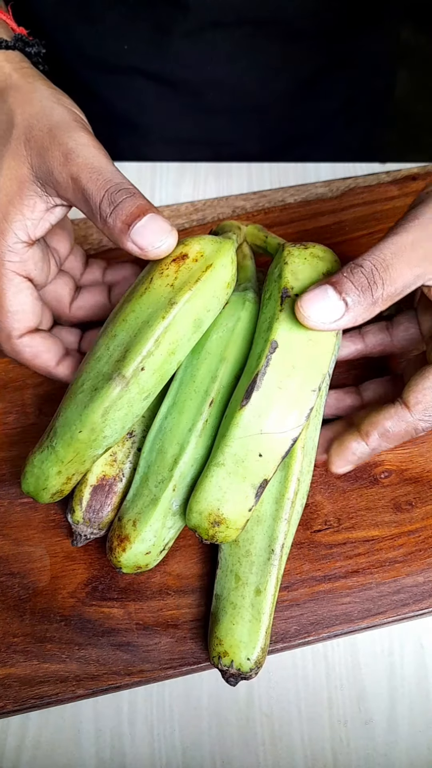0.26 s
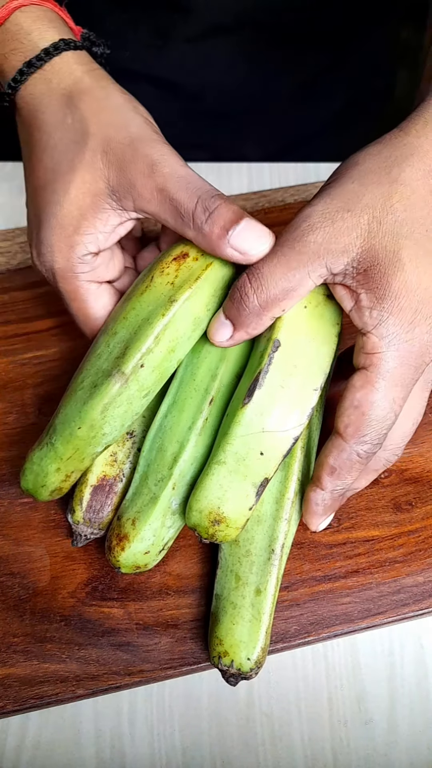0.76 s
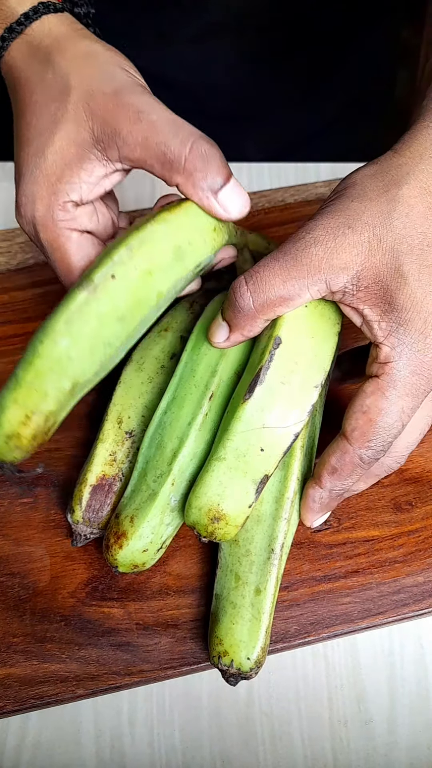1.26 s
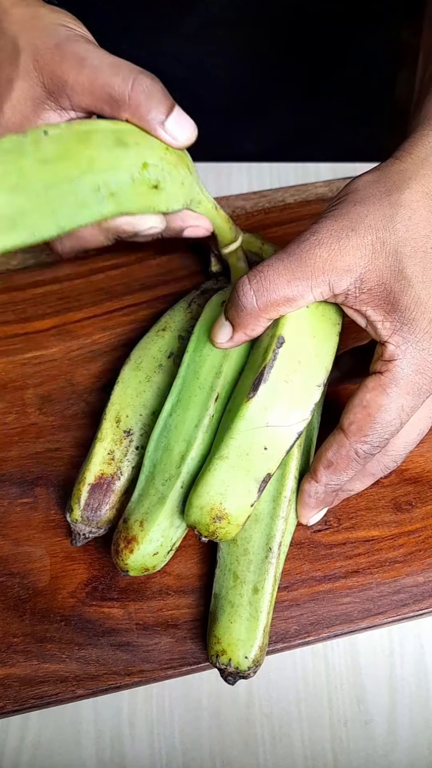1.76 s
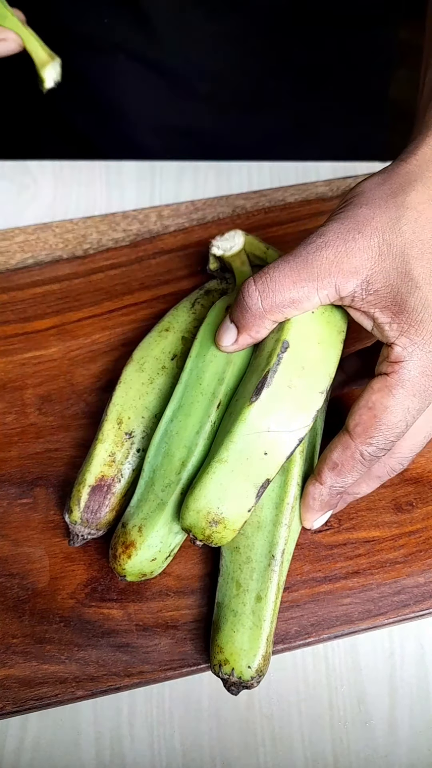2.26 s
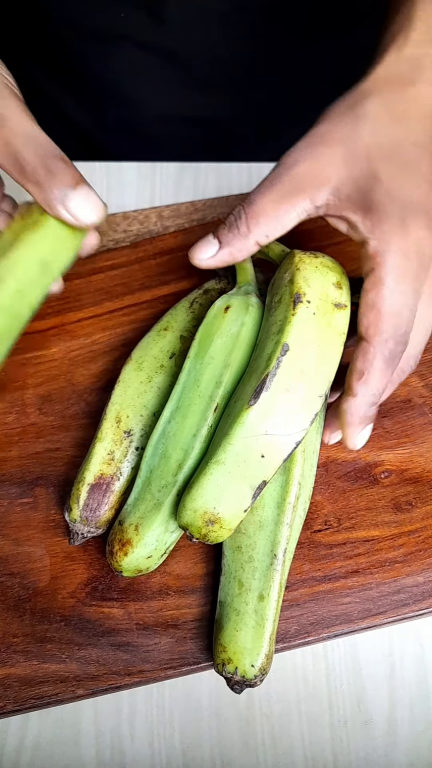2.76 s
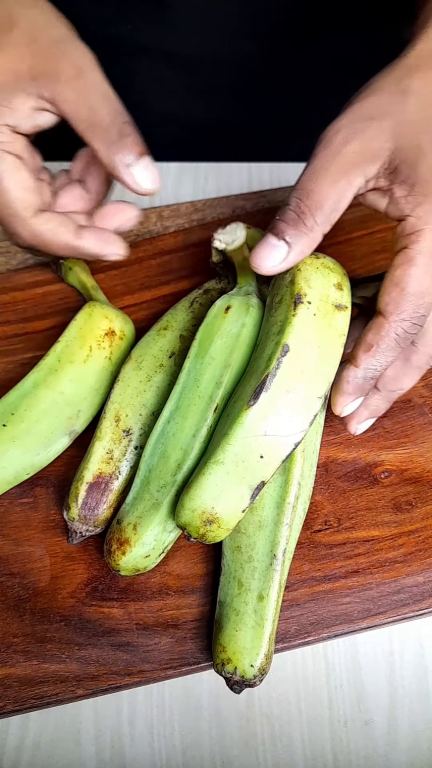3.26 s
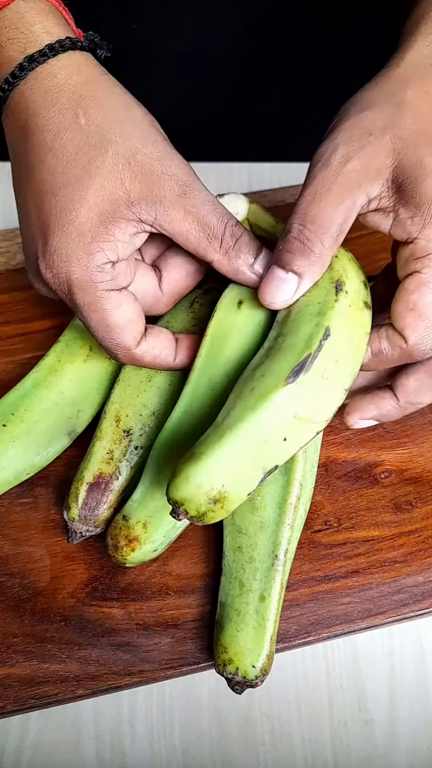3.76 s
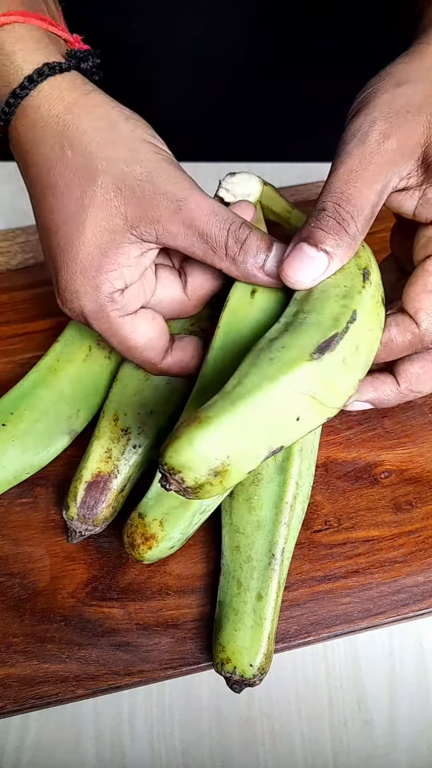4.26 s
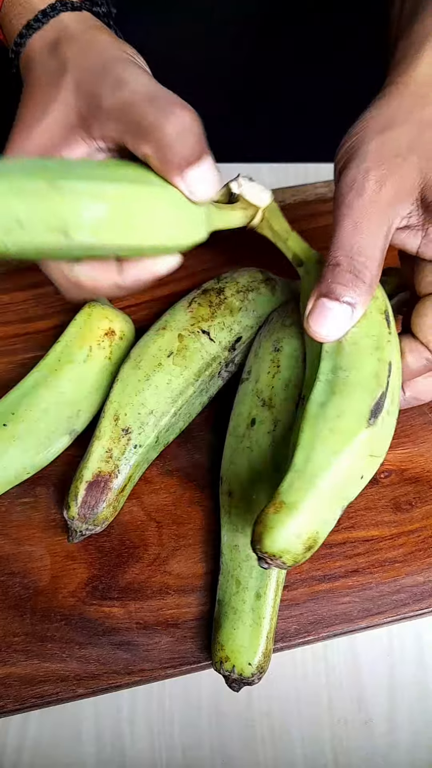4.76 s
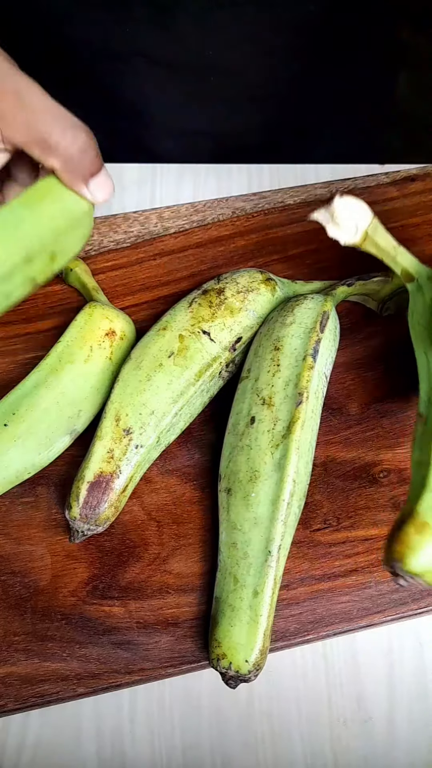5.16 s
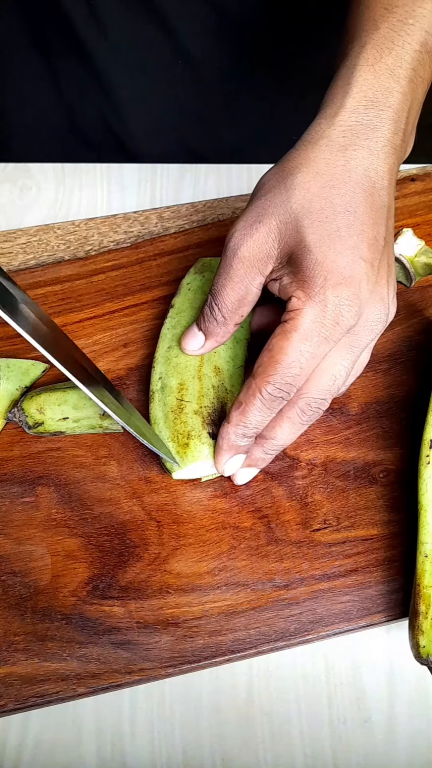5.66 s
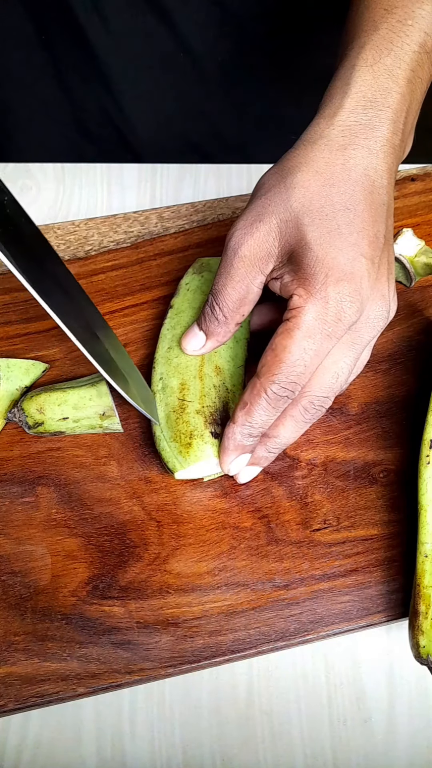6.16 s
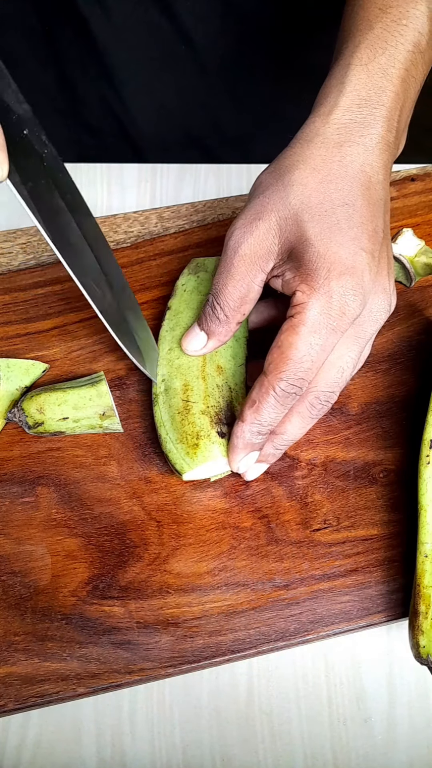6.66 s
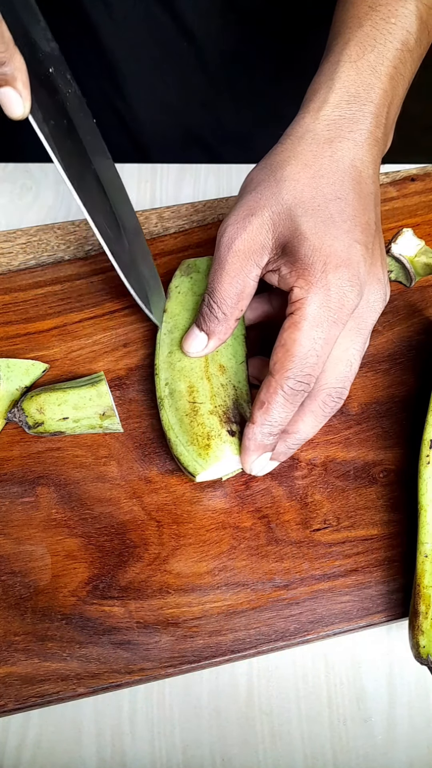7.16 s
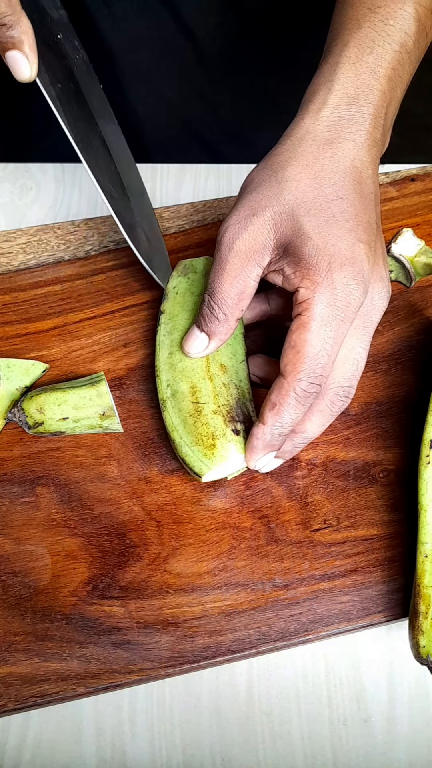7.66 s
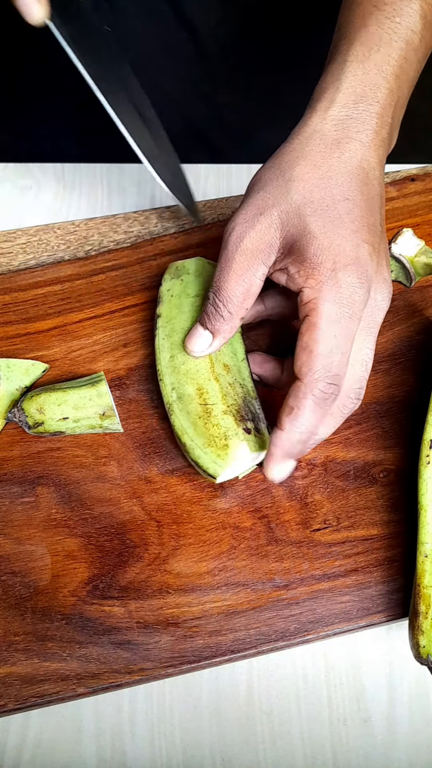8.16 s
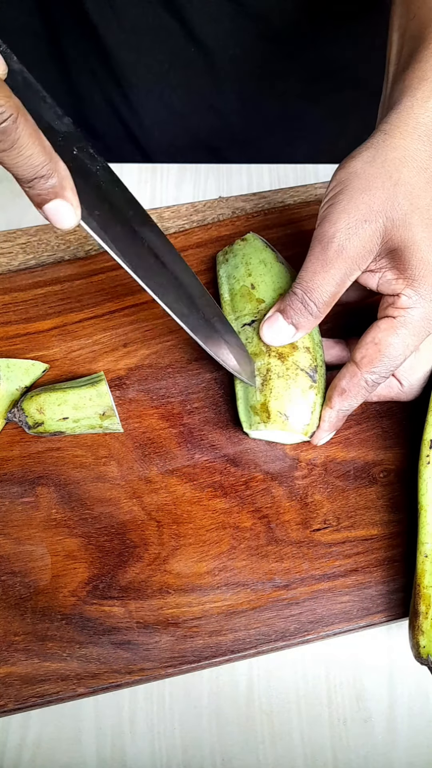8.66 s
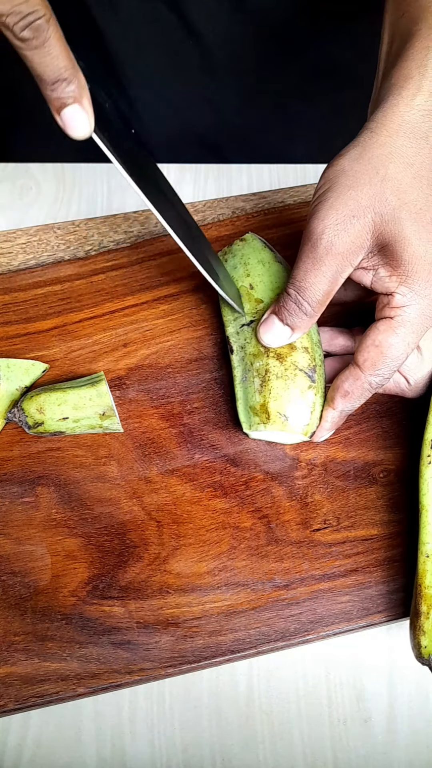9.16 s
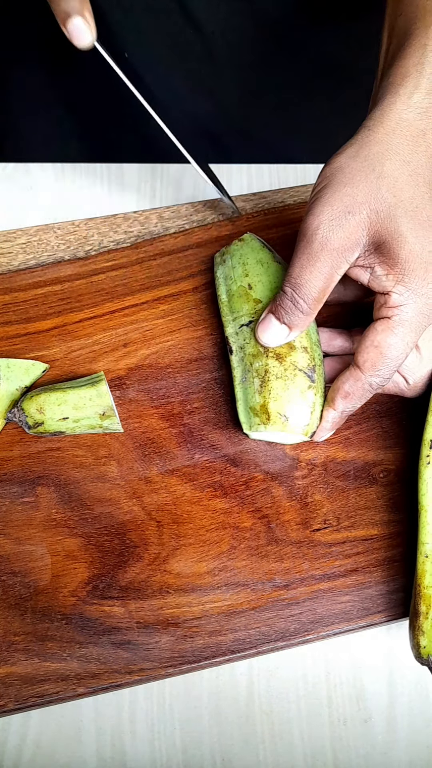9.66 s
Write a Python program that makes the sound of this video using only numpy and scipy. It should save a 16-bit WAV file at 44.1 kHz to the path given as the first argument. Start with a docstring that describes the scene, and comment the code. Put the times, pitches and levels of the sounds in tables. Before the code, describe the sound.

Sharp fibrous snaps as raw bananas are torn from a bunch, dull bumps on wood, then short crisp knife cuts and scrapes with faint room rumble.

```python
"""A small, hard kitchen at rest: rumble, hum, hiss and a dull murmur; then hands lean in and skin rubs on peel.
Stalks of green bananas, held nearer the two microphones than the board, crackle and rip: bursts of clicks.
The fruit lands on a wooden board, whose decaying modes thud while the room booms; then more stalks rip.
Last, a large knife trims one banana and slits its peel in short crunches of cell bursts, blade rings
and sap pops. Filtered noise makes the room's reflections around every source."""
import sys
import numpy as np
from scipy import signal
from scipy.fft import rfft, irfft
from scipy.io import wavfile
from scipy.ndimage import uniform_filter1d

SR = 44100
rng = np.random.default_rng(int(sys.argv[2]) if len(sys.argv) > 2 else 0)


def master_out(mix):
    """Clip the mix to full scale and print it as 16-bit PCM to the path in sys.argv[1]."""
    frames = np.transpose(np.atleast_2d(mix))
    ceiling = np.clip(frames, -1, 1)
    pcm = np.round(ceiling * 32767).astype(np.int16)
    wavfile.write(sys.argv[1], SR, pcm)


N = 437472
HZ = np.fft.rfftfreq(N, 1 / SR)
TIME = np.arange(N) / SR


def amp(db):
    """Decibels to gain."""
    return 10 ** (np.asarray(db) / 20)


def unit(x):
    """Scales to rms 1."""
    return x / np.sqrt(np.mean(x ** 2) + 1e-20)


def read(points, hz):
    """Reads a table on a log-frequency axis."""
    f, value = np.transpose(points)
    return np.interp(np.log(hz + 1), np.log(f + 1), value)


def add(mix, s, sound):
    """Mixes a sound in at time s."""
    part = mix[..., round(s * SR):][..., :sound.shape[-1]]
    part += sound[..., :part.shape[-1]]


def waver(span_s):
    """Random wavering of rms 1 that changes over about span_s."""
    size = max(round(span_s * SR), 1)
    once = uniform_filter1d(rng.standard_normal(N), size)
    return unit(uniform_filter1d(once, size))


def ping(spectrum, tilt_db, size=1024):
    """Causal click of unit energy with this spectrum, tilted in dB per octave."""
    hz = abs(np.fft.fftfreq(size, 1 / SR))
    gain_db = read(spectrum, hz) + tilt_db * np.log2(1 + hz / 1500)
    log_gain = np.log(amp(gain_db))
    # the Hilbert transform of the log gain gives the phase that packs the energy at the start
    click = np.fft.ifft(np.exp(np.conj(signal.hilbert(log_gain)))).real
    return click / np.linalg.norm(click)


def resonance(hz, width):
    """A click that rings briefly at hz; it is 6 dB down at an offset of width * hz."""
    grid = HZ[::50]
    offset = (grid / hz - 1) / width
    return ping(np.transpose([grid, -20 * np.log10(1 + offset ** 2)]), 0)


def crack(db):
    """One fibre breaks as a single impulse; db is the level over 4 ms."""
    return amp([db]) * np.sqrt(.004 * SR)


def crunch(length, db, per_s, spread_db, taper=0.23, lump_db=0.0, size=300):
    """Cells burst at random, in lumps of a few ms, under a push that swells and lets go."""
    n = max(round(length * SR), 64)
    chance, sign, strength = rng.random((3, SR))[:, :n]
    lumps = unit(uniform_filter1d(rng.standard_normal(SR), size))[:n]
    sizes = amp(spread_db * np.minimum(-np.log(1 - strength), 4) + lump_db * lumps)
    signed_bursts = (chance < per_s / SR) * np.sign(sign - .5) * sizes
    push = signal.windows.tukey(n, taper)
    return amp(db) * unit(signed_bursts * push)


def ports(bursts, click, scatter, fade_s, pan_db=0, count=7, size=900):
    """Rows: left microphone, right one (count samples later), and what goes out into the room.
    Hands, fruit and board scatter every burst differently on its way to each microphone."""
    bursts = np.pad(bursts, (0, size))
    lingering = signal.lfilter([0, 1], [1, -np.exp(-1 / (fade_s * SR))], bursts ** 2)
    noises = rng.standard_normal((2, len(bursts)))
    left_tail, right_tail = (unit(np.sqrt(lingering) * noise) for noise in noises)
    left = unit(unit(bursts) + scatter * left_tail) * amp(pan_db / 2)
    right = unit(unit(np.roll(bursts, count)) + scatter * right_tail) * amp(-pan_db / 2)
    paths = [left, right, unit(bursts)]
    return np.sqrt(np.mean(bursts ** 2)) * signal.fftconvolve(paths, click[None], axes=1)


GLANCE_FROM_S, GLANCE_TO_S, GLANCE_SHARE = .0004, .0018, .36  # delay range; gain of each reflection


def glance(sound, count=2, size=128):
    """Close reflections at random short delays colour each stroke differently."""
    taps = np.zeros(size)
    taps[0] = 1
    for delay_s in rng.uniform(GLANCE_FROM_S, GLANCE_TO_S, count):
        taps[round(delay_s * SR)] += GLANCE_SHARE
    return signal.fftconvolve(sound, taps[None] / np.linalg.norm(taps), axes=1)


# likeness of the sound at the two microphones: (frequency [Hz], left-right correlation [-1 to 1])
MICROPHONE_LIKENESS = [(30, 0.45), (100, 0.92), (200, 0.98), (350, 0.51), (700, 0.22), (2000, 0.25),
                       (16000, 0.067)]


def wash(spectrum):
    """Steady noise of rms 1, much alike at both microphones only in the bass."""
    left, other = rfft(rng.standard_normal((2, N)))
    same = np.clip(read(MICROPHONE_LIKENESS, HZ), -1, 1)
    pair = np.array([left, same * left + np.sqrt(1 - same ** 2) * other])
    return unit(irfft(pair * amp(read(spectrum, HZ)), N))


# decay of the kitchen: (frequency [Hz], time to fall 60 dB [s])
KITCHEN_T60 = [(150, 1.6), (400, 0.6), (1000, 0.47), (2800, 0.47), (7300, 0.46), (15000, 0.36)]
# relative strength of the reflections, before the echo gains in scene(): (frequency [Hz], level [dB])
KITCHEN_LEVEL = [(150, -7.5), (1000, -3.5), (3000, -6.5), (8000, -7.5), (15000, -9)]


def reflections(build_s=0.0066, size=256):
    """Dense reflections that build up briefly, each band dying at its own speed."""
    t = np.arange(SR) / SR
    hz, at, z = signal.stft(rng.standard_normal((2, SR)), SR, nperseg=size)
    t60 = read(KITCHEN_T60, hz)[:, None]
    decay = amp(read(KITCHEN_LEVEL, hz)[:, None] - 60 * at / t60)
    z *= decay * np.sqrt(2 * np.log(1000) / (t60 * SR))  # the root evens out the energy of long and short tails
    same = np.clip(read(MICROPHONE_LIKENESS, hz), -1, 1)[:, None]  # long waves reach both microphones alike
    z[1] = same * z[0] + np.sqrt(1 - same ** 2) * z[1]
    return signal.istft(z, SR, nperseg=size)[1][:, :SR] * (1 - np.exp(-t / build_s))


def kitchen(x, drift_s):
    """The sound drifts between two patterns of reflections; a quick drift leaves a diffuse tail."""
    turn = 2 * np.pi * TIME / drift_s
    echo = np.zeros((2, N))
    for share in (np.cos(turn), np.sin(turn)):
        echo += signal.fftconvolve((x * share)[None], reflections(), axes=1)[:, :N]
    return echo


# spectral shape of the faint hiss: (frequency [Hz], relative level [dB])
HISS_SPECTRUM = [(100, -6), (400, -1), (800, -6.5), (1200, -17.5), (1800, -21), (2600, -24.5),
                 (4500, -25.5), (6300, -30), (8400, -22), (11000, -26), (15500, -27.5), (16500, -44)]
HISS_DB = -68.5


def hiss():
    """Faint steady hiss: noise shaped by its spectrum."""
    return wash(HISS_SPECTRUM) * amp(HISS_DB)


# spectral shape of the faint dull room murmur: (frequency [Hz], relative level [dB])
MURMUR_SPECTRUM = [(150, -25.5), (350, -7.5), (600, -5), (900, -1.5), (1500, -6), (3000, -24), (8000, -61)]
MURMUR_DB, MURMUR_SWING_DB, MURMUR_S = -77, 3, .16  # mean level, rms swing, span of the wavering


def room_murmur():
    """A faint, dull background murmur whose level wavers at random."""
    level_db = MURMUR_DB + MURMUR_SWING_DB * waver(MURMUR_S)
    return wash(MURMUR_SPECTRUM) * amp(level_db)


# strength of the low hum: (time [s], level [dB])
HUM_LEVEL = [(0, -62.5), (.7, -52.5), (1.5, -67), (3.9, -61.5), (4.6, -80), (9.9, -55)]
HUM_HZ = 69.1


def hum():
    """A low sine, alike at both microphones, whose level wavers."""
    level_db = np.interp(TIME, *np.transpose(HUM_LEVEL))
    return np.sqrt(2) * np.sin(2 * np.pi * HUM_HZ * TIME) * amp(level_db)


# spectral shape of the low rumble: (frequency [Hz], relative level [dB])
RUMBLE_SPECTRUM = [(12, -57), (20, -20.5), (32, -20), (54, -10.5), (114, -0.5), (133, 0.5), (162, -8.5),
                   (209, -11), (241, -7), (303, -19.5), (344, -15.5), (420, -26), (567, -35), (600, -28.5),
                   (780, -57.5), (1320, -120)]
# hands lean and work on the board: (start time [s], length [s], level before wavering [dB])
HANDLING_SPANS = [(0.313, 0.94, -54), (1.407, 0.91, -49), (3.651, 0.35, -51.5), (4.6, 0.39, -50.5),
                  (5.413, 0.77, -52), (6.061, 1.447, -48.5), (7.395, 0.98, -50), (8.503, 1.35, -52)]
REST_RUMBLE_DB = -54.5  # the room at rest
LEAN_S, HEAVE_DB, HEAVE_S = 0.13, 1.5, 0.069  # the weight comes on and off over LEAN_S and wavers


def rumble():
    """Low noise that grows as hands lean on the table, over the room at rest."""
    work = np.zeros(N)
    for s, length, db in HANDLING_SPANS:
        lean = np.minimum(TIME - s, s + length - TIME) / LEAN_S
        work += amp(db) * np.clip(lean, 0, 1)
    heaving = work * amp(HEAVE_DB * waver(HEAVE_S))
    return wash(RUMBLE_SPECTRUM) * np.hypot(amp(REST_RUMBLE_DB), heaving)


# skin rubbing on peel and wood: (start time [s], length [s], pitch [Hz], level [dB])
SKIN_RUBS = [(0.473, 0.22, 585, -62), (2.86, 0.056, 335, -47.5), (7.921, 0.08, 454, -58)]


def rubs(width=0.18):
    """Waxy skin sticks and slips: a short, hoarse note."""
    out = np.zeros((3, N))
    for s, length, hz, db in SKIN_RUBS:
        slips = crunch(length, db, per_s=9100, spread_db=3.5)
        add(out, s, ports(slips, resonance(hz, width), scatter=1.0, fade_s=0.0012))
    return out


# spectral shape of peel, also of ticks and blade: (frequency [Hz], relative level [dB])
PEEL_SPECTRUM = [(100, 0.5), (500, 4), (1200, -7.5), (1500, -2), (1850, -3), (2300, -0.5), (3000, -1),
                 (3900, 3.5), (5000, -4), (7700, -3), (9900, -6), (11000, -7), (13500, -4), (15600, -5.5),
                 (16500, -45)]
# fingers and fruit brushing over peel:
# (start time [s], length [s], level [dB], brightness [dB per octave])
PEEL_RUSTLES = [(2.857, 0.027, -61, 2), (2.917, .024, -52.5, 1), (2.942, 0.083, -60.5, -6),
                (3.584, 0.066, -76, -5), (3.896, 0.043, -61.5, -9.5), (4.148, 0.072, -65, -6),
                (4.822, 0.018, -46.5, 0.5), (4.866, 0.022, -43.5, -3), (5.437, 0.052, -74.5, 5.5),
                (6.151, 0.082, -62, -1), (6.412, 0.091, -67, 0), (8.04, 0.066, -67.5, -3.5)]


def rustles():
    """Skin brushes over waxy peel in soft, fine-grained strokes."""
    out = np.zeros((3, N))
    for s, length, db, tilt_db in PEEL_RUSTLES:
        grains = crunch(length, db, per_s=2500, spread_db=4.5, taper=0.63)
        stroke = ports(grains, ping(PEEL_SPECTRUM, tilt_db), scatter=1.2, fade_s=0.0017)
        add(out, s, glance(stroke))
    return out


# heavy fruit dragged and rolled on the board: (start time [s], length [s], level before panning [dB])
FRUIT_SCUFFS = [(1.935, 0.027, -45.5), (2.869, 0.074, -46.5), (2.915, 0.064, -36), (2.974, 0.1, -45),
                (4.848, 0.054, -48), (5.779, 0.04, -44.5), (8.597, 0.034, -53)]
# spectral shape of fruit on wood: (frequency [Hz], relative level [dB])
SCUFF_SPECTRUM = [(25, -28), (55, -8.5), (95, 10.5), (170, 7.5), (320, 2.5), (420, -16), (520, -5.5),
                  (900, -21), (1400, -21.5), (2200, -27), (6000, -34), (16000, -43.5)]


def scuffs():
    """Heavy fruit shifts on the wood with a dull, grainy shuffle."""
    out = np.zeros((3, N))
    click = ping(SCUFF_SPECTRUM, 0, size=2048)
    for s, length, db in FRUIT_SCUFFS:
        grains = crunch(length, db, per_s=4800, spread_db=4.0)
        add(out, s, ports(grains, click, scatter=1.0, fade_s=.003, pan_db=-3.0))
    return out


# firm flesh pops as a stalk parts, or smacks on wood and other fruit:
# (time [s], pitch [Hz], level at the microphones [dB])
FLESH_SMACKS = [(1.421, 1320, -40.5), (1.9325, 840, -36.5), (2.924, 1220, -47.5), (2.937, 940, -44),
                (2.955, 1360, -51), (3.002, 535, -37), (3.003, 1300, -47), (3.026, 1300, -51),
                (4.881, 597, -42.5)]
SMACK_WIDTH, SMACK_ROOM_DB = .21, -2  # width as a share of pitch; level thrown into the room


def smacks():
    """Firm, damp flesh gives a short, broad pop from one damped resonance."""
    out = np.zeros((3, N))
    for s, hz, db in FLESH_SMACKS:
        add(out, s, ports(crack(db), resonance(hz, SMACK_WIDTH), scatter=.7, fade_s=.002))
    return out * amp([[0], [0], [SMACK_ROOM_DB]])


# pushes of the blade through peel, which also knock the board: (start time [s], length [s], level [dB],
# brightness [dB per octave], hollow body and dry rasp [both dB against the push])
BLADE_PUSHES = [(5.612, 0.024, -57, -2.5, -2, -15), (5.781, 0.036, -44.5, -2.5, -8, -4.5),
                (5.986, .03, -60, 4, -10, -5), (6.136, 0.077, -59, -3, -27, -7),
                (6.224, 0.023, -51, -1, -18, -7), (6.262, 0.026, -58, -1, -6, -16),
                (6.389, 0.059, -62.5, 1.5, -3, -11), (6.471, .04, -59.5, 3, -4, -19),
                (6.584, 0.029, -56, 1, -9, -12), (6.63, 0.026, -46.5, 0.5, -24, -27),
                (6.67, 0.026, -52.5, 2, -11, -23), (6.82, 0.056, -55.5, 2.5, -17.5, -10),
                (6.887, 0.049, -50, 1.5, -15, -13), (6.933, 0.023, -54, 1, -11, -14),
                (7.003, 0.054, -48.5, 1.5, -18, -14), (7.216, 0.06, -50.5, 3, -10, -15),
                (7.378, .098, -67, 5.5, -7.5, -22), (7.691, 0.074, -60, 10, -15, -16),
                (8.024, 0.03, -55, 11, -5, -5.5), (8.557, 0.024, -55.5, 5, -3, -14),
                (8.596, 0.055, -43.5, -0.5, -9, -5), (8.84, 0.061, -55.5, -2, -26, -23),
                (8.935, 0.047, -48, -1.5, -17, -12), (8.975, .03, -57, 0, -9, -6),
                (9.032, 0.023, -60, 0, -7, -1.5), (9.067, 0.023, -53.5, -1, -7, -10),
                (9.098, 0.069, -53.5, -6, -8, -6), (9.17, 0.029, -51.5, -2, -7, -1),
                (9.213, 0.031, -47, 1, -23, -2.5), (9.288, 0.041, -45.5, 0, -22, -11),
                (9.334, 0.026, -48.5, -2, -6, -9), (9.376, 0.056, -53, -2.5, -9, -6),
                (9.452, 0.036, -50, -3, -13, -5), (9.503, 0.048, -53.5, 0, -12, -7),
                (9.575, 0.057, -56.5, 3.5, -7, -13)]
# fruit and hand bumping the board: (time [s], drive of the thud [dB], drive of the room boom [dB])
BOARD_BUMPS = [(1.421, -47.5, -49.5), (1.933, -36.5, -32.5), (2.87, -44, -55), (2.923, -35.5, -32),
               (3.001, -36.5, -26), (5.456, -55.5, -51), (6.169, -46.5, -46), (8.035, -66.5, -39.5),
               (9.428, -62, -41)]
# modes of the board on its table: (frequency [Hz], relative level [dB], time to fall 60 dB [s])
BOARD_MODES = [(109, 3.5, 0.32), (170.8, 0, 0.36), (233.8, -1.5, 0.33), (306, -1, 0.096),
               (364.4, -0.5, 0.17), (478, -1, 0.13), (584.6, -13.5, 0.08), (854, -19.5, 0.038)]
# low modes of the kitchen: (frequency [Hz], relative level [dB])
KITCHEN_MODES = [(97, -11.5), (125, -2), (146, -13), (173, -11.5)]
KNOCK_DB, KNOCK_BOOM_DB = -1.5, -4  # drive of thud and boom against the level of a push
BOARD_PAN_DB = -4.5  # the board lies a little to the right


def board(swell_s=0.054, touch_s=0.0022):
    """Soft blows and pushes of the knife ring the board; low room modes swell after each and die away."""
    t = np.arange(SR) / SR
    ring, room = np.zeros((2, SR))
    for k, (hz, db, t60) in enumerate(BOARD_MODES):
        ring += amp(db - 60 * t / t60) * np.sin(2 * np.pi * hz * t) * (-1) ** k
    for hz, db in KITCHEN_MODES:
        room += amp(db) * np.sin(2 * np.pi * hz * t)
    thud = ring / abs(ring).max() * 2 * (1 - np.exp(-t / touch_s))  # a soft touch rounds the onset
    boom = t / swell_s * np.exp(1 - t / swell_s) * room
    knocks = [(s + length / 2, db + KNOCK_DB, db + KNOCK_BOOM_DB) for s, length, db, *_ in BLADE_PUSHES]
    thuds, booms = np.zeros((2, N))
    for s, thud_db, boom_db in list(BOARD_BUMPS) + knocks:
        add(thuds, s, amp(thud_db) * thud)
        add(booms, s, amp(boom_db) * boom)
    return thuds * amp([[BOARD_PAN_DB / 2], [-BOARD_PAN_DB / 2]]), booms


POP_LOW_HZ, POP_HIGH_HZ, POPS_PER_S = 490, 4220, 280
POP_CYCLES, POP_DB = 1.4, -9  # cycles to fall to 1/e; level against the push


def sap(length, db, taper, spread_db=4):
    """Pockets of sap pop under the edge, each ringing for a few cycles at a pitch of its own."""
    n = max(round(length * SR), 64)
    t = np.arange(1024) / SR
    push = signal.windows.tukey(n, taper)
    out = np.zeros(n)
    for when, pitch, size in rng.random((256, 3))[:max(round(length * POPS_PER_S), 2)]:
        cycles = t * POP_LOW_HZ * (POP_HIGH_HZ / POP_LOW_HZ) ** pitch
        ring = unit(np.sin(2 * np.pi * cycles) * np.exp(-cycles / POP_CYCLES))
        add(out, when * (n - 1) / SR, amp(-spread_db * np.log(1 - .95 * size)) * ring)
    return amp(db + POP_DB) * unit(out * push)


# resonances of the scraping blade, before random shifts of pitch and grip:
# (frequency [Hz], width [share of frequency], level [dB against the push])
BLADE_RINGS = [(1011, .14, -18), (1503, 0.062, -13.5), (2275, 0.15, -13.5), (2956, 0.072, -18),
               (3800, 0.12, -18)]


def blade(length, db, tilt_db, taper, wander=0.09, grip_db=3, peel_db=-4.0):
    """One movement: peel cells burst, sap pops, and the edge sticks and slips with randomly shifted rings."""
    cells = crunch(length, db + peel_db, per_s=1000, spread_db=3.7, taper=taper)
    out = ports(cells, ping(PEEL_SPECTRUM, tilt_db), scatter=2.2, fade_s=0.002)
    shifts_and_grips = 2 * rng.random((len(BLADE_RINGS), 2)) - 1
    for (hz, width, ring_db), (shift, grip) in zip(BLADE_RINGS, shifts_and_grips):
        slips = crunch(length, db + ring_db + grip_db * grip, per_s=600, spread_db=5.0, taper=taper)
        ring = resonance(hz * (1 + wander * shift), width)
        out = out + ports(slips, ring, scatter=1, fade_s=0.0036)
    add(out, 0, np.array([sap(length, db, taper) for path in out]))  # each path catches other pops
    return out


SLIT_START_S, SLIT_LENGTH_S, SLIT_DB = 8.89, 0.69, -60


def slit(judder_db=1.0, judder_s=0.011):
    """One long draw of the blade down the whole fruit, catching and running on."""
    out = np.zeros((3, N))
    add(out, SLIT_START_S, blade(SLIT_LENGTH_S, SLIT_DB, tilt_db=5.0, taper=0.12))
    return out * amp(judder_db * waver(judder_s))


# the edge sinks deep and the wet flesh squelches: (start time [s], length [s], level [dB])
FLESH_SQUELCHES = [(8.596, .05, -45), (8.843, 0.062, -62.5), (8.939, 0.051, -56), (9.028, .11, -62),
                   (9.175, .08, -52.5), (9.291, .13, -58), (9.446, 0.095, -63)]
# spectral shape of wet flesh: (frequency [Hz], relative level [dB])
WET_SPECTRUM = [(200, -25), (450, -5), (600, 4.5), (820, -6), (980, 3.5), (1350, 1.5), (1750, -17),
                (2200, 4.5), (2900, -17), (4500, -8.5), (8000, -35), (16000, -45)]
# sharp ticks of peel, nail and blade: (time [s], level [dB], brightness [dB per octave])
PEEL_TICKS = [(.547, -52, -1), (2.311, -54, -7.5), (2.852, -60.5, 1), (3.001, -41.5, -8),
              (5.459, -53.5, -10), (5.579, -65, 2), (5.628, -45.5, 3), (5.7919, -41.5, 2),
              (5.798, -40, 0.5), (5.956, -58.5, 3), (6.02, -42, 0.5), (6.149, -48.5, 1.5), (6.17, -49, 1),
              (6.225, -43, 0), (6.451, -52.5, 0), (6.483, -58, 5), (6.595, -59, -5), (6.645, -48, 0),
              (6.821, -50.5, 0.5), (8.503, -57, -0.5), (8.584, -34, -2.5), (8.5987, -34.5, 0),
              (8.614, -36, -4), (8.625, -44, -1), (8.943, -46, -5), (9.1772, -42, -1), (9.212, -45, 0),
              (9.293, -50, 2)]
BODY_HZ, BODY_WIDTH = 560, 0.51  # the hollow flesh; widths as a share of Hz
RASP_HZ, RASP_WIDTH = 6500, 0.57  # the dry fibres
GRIT_DB, GRIT_S = 1, 0.0016  # depth and duration of each catch of the edge


def knife():
    """The edge catches and slips through firm peel, hollow flesh and dry fibres; tough strands tick."""
    out = np.zeros((3, N))
    body, rasp = resonance(BODY_HZ, BODY_WIDTH), resonance(RASP_HZ, RASP_WIDTH)
    for s, length, db, tilt_db, body_db, rasp_db in BLADE_PUSHES:
        add(out, s, glance(blade(length, db, tilt_db, taper=0.53)))
        hollow = crunch(length, db + body_db, per_s=1900, spread_db=2.5)
        add(out, s, ports(hollow, body, scatter=1.0, fade_s=0.0013))
        dry_fibres = crunch(length, db + rasp_db, per_s=1300, spread_db=1)
        add(out, s, ports(dry_fibres, rasp, scatter=1.2, fade_s=0.0026))
    for s, length, db in FLESH_SQUELCHES:
        wet_bursts = crunch(length, db, per_s=500, spread_db=3.5)
        add(out, s, ports(wet_bursts, ping(WET_SPECTRUM, 0), scatter=2.0, fade_s=0.0013))
    out = out * unit(amp(GRIT_DB * waver(GRIT_S)))
    for s, db, tilt_db in PEEL_TICKS:
        add(out, s, ports(crack(db), ping(PEEL_SPECTRUM, tilt_db), scatter=1.6, fade_s=0.002))
    return out


# spectral shape of a thin fibre breaking: (frequency [Hz], relative level [dB])
THIN_FIBRE = [(100, -21), (500, -13.5), (1100, -24), (2200, -20), (4000, -21.5), (6500, -22), (8400, -9),
              (10500, -15), (12700, -1.5), (15000, 1), (17000, -19)]


def fibre(thickness, thick):
    """Thick strands ring lower; thin ones only fizz."""
    share = np.clip(thickness, 0, 1)
    hz = HZ[::200]
    level_db = share * read(thick, hz) + (1 - share) * read(THIN_FIBRE, hz)
    return ping(np.transpose([hz, level_db]), 0)


# spectral shape of a thick strand towards the microphones: (frequency [Hz], relative level [dB])
THICK_DIRECT = [(100, -18.5), (500, -19.5), (1100, -15.5), (2000, -17), (4000, -11), (5200, -8), (6200, -4),
                (7600, 2), (9000, 5), (10800, -8.5), (12500, -6.5), (15000, -2.5), (17000, -23)]
# its broader, flatter sound sideways into the room: (frequency [Hz], relative level [dB])
THICK_SIDEWAYS = [(100, -20.5), (500, -13.5), (1300, -8.5), (2200, -14.5), (3000, -9.5), (4200, -6.5),
                  (5200, -5), (7200, -2), (9000, -4), (11000, -6.5), (15000, -8.5), (17000, -21.5)]


def splinter(bursts, thickness, scatter, fade_s, pan_db=0, around_db=-2.5):
    """Breaking fibres ring towards the microphones and throw a flatter sound into the room."""
    direct = ports(bursts, fibre(thickness, THICK_DIRECT), scatter, fade_s, pan_db)
    around = ports(bursts, fibre(thickness, THICK_SIDEWAYS), scatter, fade_s)
    return np.array([direct[0], direct[1], around[2] * amp(around_db * thickness)])


# a stalk is bent and its fine fibres crackle: (start time [s], length [s], level at mid-bend [dB])
STALK_BENDS = [(1.178, 0.19, -69), (1.659, 0.37, -51.5), (4.505, 0.084, -65), (4.648, 0.29, -46)]
# the strongest stalk fibres crack one by one:
# (time [s], level before panning [dB], thickness [0-1], left against right [dB])
FIBRE_SNAPS = [(1.257, -54.5, 0.37, 9), (1.328, -57, .3, 3), (1.346, -52.5, 0.3, 0), (1.3741, -42, 0.15, 0),
               (1.4204, -18, 0.92, 5), (1.609, -50, 0.4, 6.5), (1.68, -52, 0.4, 6.5), (1.686, -55, .4, 0),
               (1.698, -46.5, 0.2, 15), (1.712, -29.5, 0.06, 4), (1.7165, -29.5, 0.33, 4),
               (1.764, -33, 0.37, 5), (1.7912, -31.5, 0.65, 8.5), (1.812, -43, .4, 0),
               (1.8354, -40, 0.3, 5), (1.861, -45.5, 0.2, 2), (1.884, -37.5, 0.3, 0), (1.8932, -40, 0.7, 4),
               (1.901, -35, .1, 2), (1.9082, -29, 0.3, 0), (1.923, -30, 0.2, 2), (1.9338, -20, 0.57, 10),
               (4.537, -56, 0.8, -2), (4.612, -50, 0.64, 2), (4.6472, -24.5, 0.7, -2),
               (4.6657, -29.5, 0.25, -3), (4.679, -37, 0.4, 10), (4.6918, -30, 0.5, -4),
               (4.7102, -35.5, 0.3, -2), (4.755, -27.5, 0.35, -1), (4.773, -37, 0.3, 1),
               (4.7795, -27, 0.37, 2), (4.8046, -38, 0, 4), (4.8116, -42, .05, 0), (4.827, -23.5, 0.4, 0),
               (4.833, -23.5, 0.06, 1), (4.8345, -24, 0.27, -2), (4.858, -31.5, 0.5, 9),
               (4.8744, -34, 0.35, 1)]
# the stalk rips through: (start time [s], length [s], level [dB], thickness [0-1])
STALK_TEARS = [(1.925, 0.012, -32.5, 0.5), (1.9284, 0.008, -18, 0.42), (4.796, 0.031, -44, 0.1),
               (4.822, 0.01, -30, .05), (4.838, 0.0073, -27, 0.15), (4.849, 0.03, -33.5, 0.23),
               (4.869, 0.012, -35, 0.62)]
STRAIN_DB_PER_S, FINE_PER_S, FINE_SPREAD_DB, FINE_THICKNESS = 33.5, 450, 6, 0.18


def stalks():
    """The bent stalk crackles in clumps under rising strain, cracks fibre by fibre, then rips."""
    out = np.zeros((3, N))
    for s, length, db in STALK_BENDS:
        fine = crunch(length, db, per_s=FINE_PER_S, spread_db=FINE_SPREAD_DB, taper=0.13, lump_db=2.5)
        strain = amp(STRAIN_DB_PER_S * (np.arange(len(fine)) / SR - length / 2))
        add(out, s, splinter(fine * strain, FINE_THICKNESS, scatter=1.0, fade_s=.0012))
    for s, db, thickness, pan_db in FIBRE_SNAPS:
        add(out, s, splinter(crack(db), thickness, scatter=1.3, pan_db=pan_db, fade_s=.0012))
    for s, length, db, thickness in STALK_TEARS:
        rip = crunch(length, db, per_s=3400, spread_db=3.5)
        add(out, s, splinter(rip, thickness, scatter=1.0, fade_s=.0016))
    return out


def scene():
    """All sources in the kitchen; stalks are nearer the microphones than the board and sound every way."""
    background = rumble() + hum() + hiss() + room_murmur()
    dull = scuffs()
    thuds, booms = board()
    cutting = knife() + slit() + rubs() + smacks() + rustles()
    near = stalks()
    direct = near[:2] + cutting[:2] + dull[:2] + thuds + booms
    stalk_echo = kitchen(amp(1.0) * near[2], drift_s=.013)
    knife_echo = kitchen(amp(1.0) * cutting[2], drift_s=.06)
    thud_echo = kitchen(amp(3.7) * dull[2] + amp(6.0) * thuds.mean(0), drift_s=1.7)
    return direct + stalk_echo + knife_echo + thud_echo + background


EDGE_HZ = 16300


def record(dry):
    """Full-scale limit, then a low-pass band limit at EDGE_HZ."""
    lowpass = signal.firwin(255, EDGE_HZ, window=("kaiser", 9), fs=SR)
    return signal.oaconvolve(np.clip(dry, -1, 1), lowpass[None], "same")


dry = scene()
out = record(dry)
master_out(out)
```